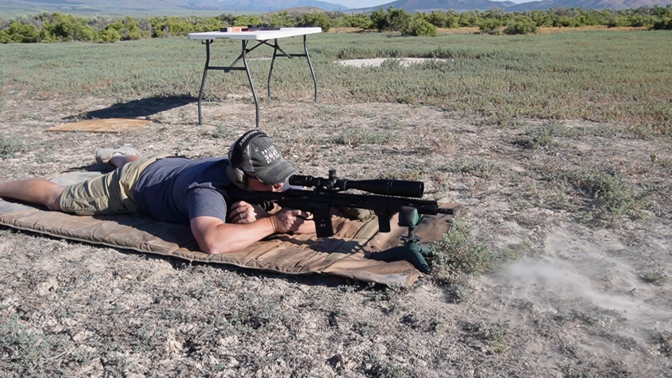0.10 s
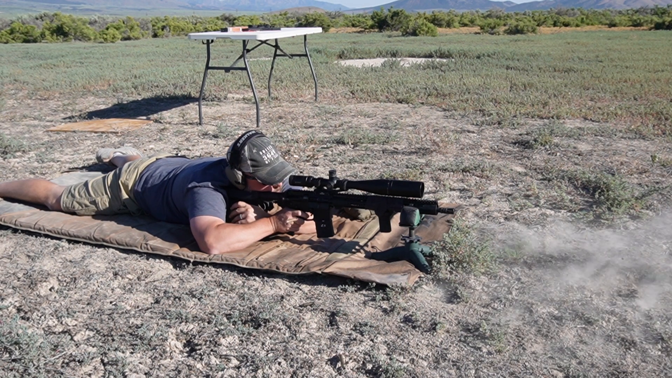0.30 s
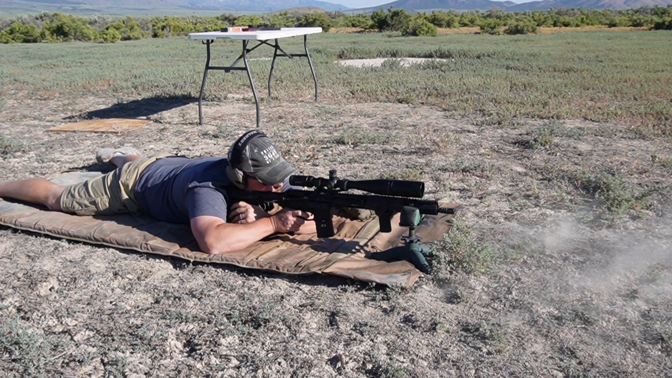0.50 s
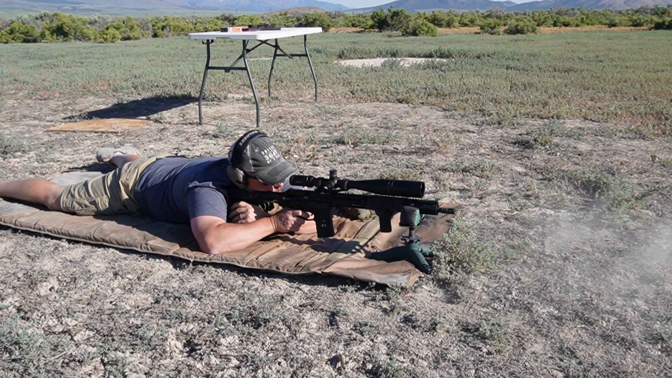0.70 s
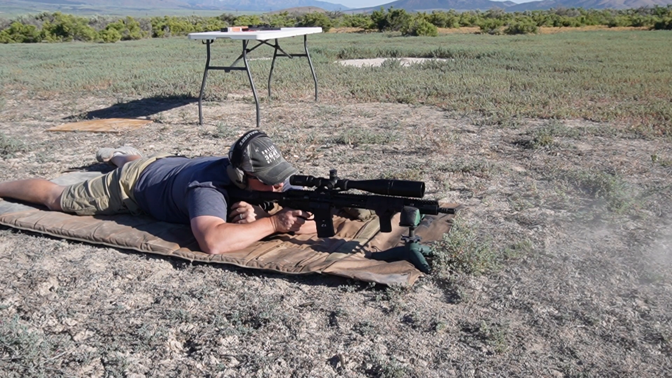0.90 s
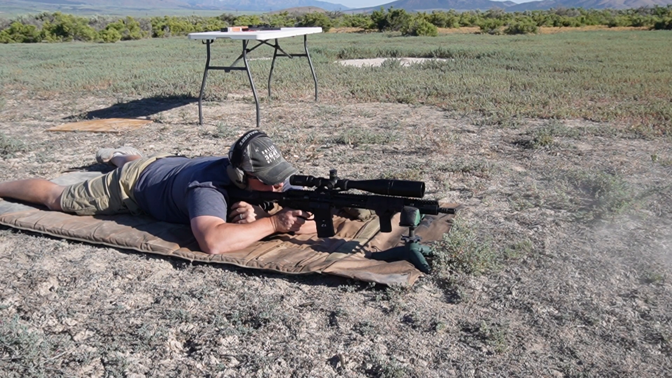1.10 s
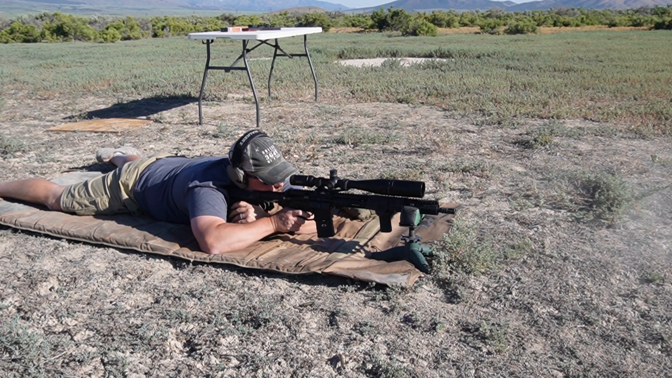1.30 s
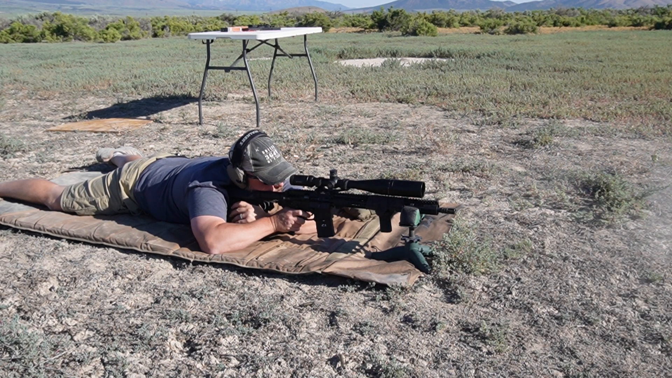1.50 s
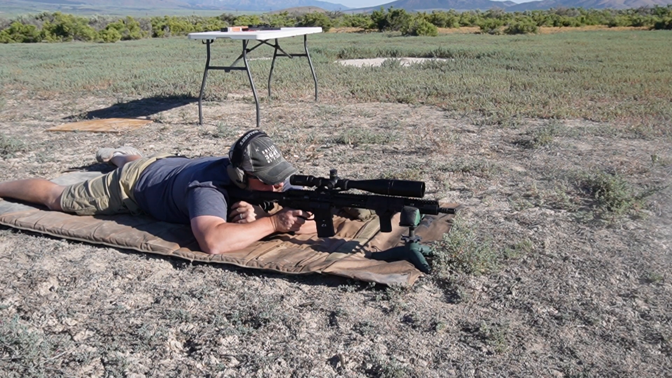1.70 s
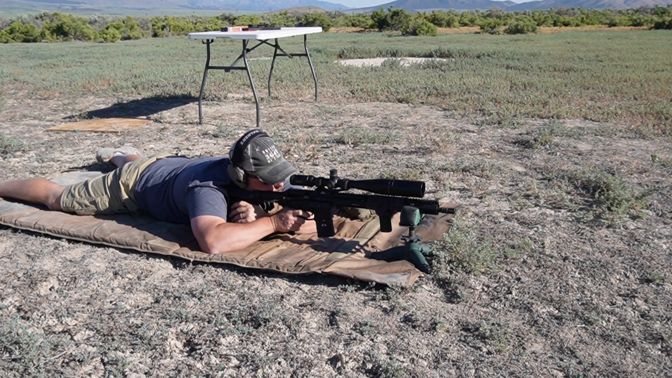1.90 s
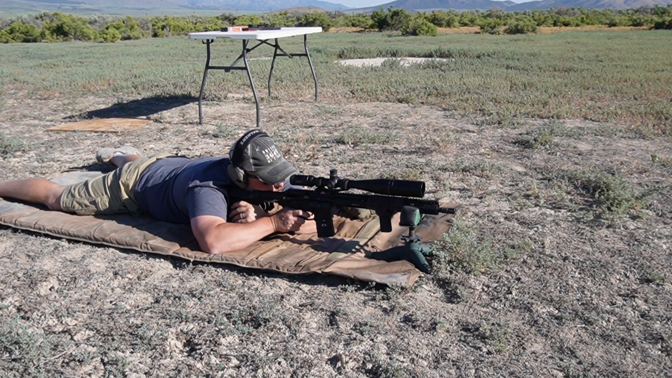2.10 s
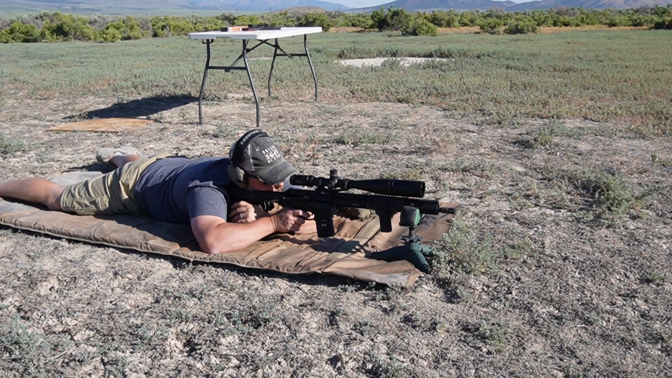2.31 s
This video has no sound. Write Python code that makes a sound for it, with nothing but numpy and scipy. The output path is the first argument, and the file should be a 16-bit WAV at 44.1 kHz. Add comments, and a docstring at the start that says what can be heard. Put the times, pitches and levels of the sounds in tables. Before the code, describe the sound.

One rifle shot at an open outdoor range. Faint air and a tiny tick, then at 0.2 s a sharp crack and clipped blast, with bolt clatter, low metallic ring and a grainy hissing rush until about 0.5 s. A spent case clinks at 0.6 s and bounces softly near 0.8. At 1.0 s a loud dry smack returns from downrange. Dull echoes fade over faint drone and whine.

```python
"""Rifle shot on an open range

One shot on dirt: a short crack leads the muzzle blast, which overloads the microphone.
The action cycles and rings while the blast scatters back from the ground as grainy, coloured noise.
The spent case lands and bounces on pulsing modes, and a sharp smack comes back from downrange.
A faint echo rolls in from the hills as dull noise, over still air, a far drone and a thin whine."""
import sys
import numpy as np
from scipy import signal
from scipy.fft import rfft, irfft, next_fast_len
from scipy.io import wavfile
from scipy.ndimage import uniform_filter1d, map_coordinates

SR = 44100
rng = np.random.default_rng(int(sys.argv[2]) if len(sys.argv) > 2 else 0)


def generate_wav(signal):
    """Clip the signal to [-1, 1] and save it as 16-bit WAV at the path in sys.argv[1]."""
    frames = np.transpose(np.atleast_2d(signal))
    scaled = np.clip(frames, -1, 1) * 32767
    pcm = np.round(scaled).astype(np.int16)
    wavfile.write(sys.argv[1], SR, pcm)


N = 110250

# Still air: f/Hz, level/dB
AIR_COLOUR = [(25, 14), (60, 11), (130, 0), (420, -1), (900, -11), (2500, -15), (7000, -17), (15500, -17.5)]
AIR_DB = -57.3
# Faint far drone: t/s, pitch f/Hz, fundamental rms level/dB, octave rms level/dB
DRONE = [(0, 179, -62, -65), (1.1, 181, -65, -74), (1.75, 182, -62, -72), (2, 184.5, -58.5, -62),
         (2.5, 185.5, -63.5, -71)]
DRONE_WAVER_DB = 1.5
# Thin whine: overtone spacing, rms level of its lowest tone, loss from each overtone to the next
WHINE_HZ, WHINE_DB, WHINE_LOSS_DB = 250, -77, .9

# Small ticks of trigger and grit: t/s, level/dB, t60/s, centre f/Hz
TICKS = [(.163, -47.5, .04, 1700), (.5972, -52, .03, 7000), (.747, -52, .04, 6000),
         (1.1679, -47, .016, 4700), (1.452, -60, .06, 3500)]

# Parts of the report: start t/s, level/dB, attack/s, hold/s, t60/s
CRACK = (.2124, -10, .0005, .0009, .013)
BLAST = (.2174, -3, .0002, .005, .018)
BOOM = (.221, -15.5, .003, .046, .016)
SWING = (.2183, -6.5, .001, .006, .08)
# The blast's pressure swing falls by the drop towards its low pitch; the fall is a time constant
SWING_LOW_HZ, SWING_DROP_HZ, SWING_FALL_S = 280, 2700, .0062
SWING_ROUGH_RAD = .9
# Separate thumps within the boom: t/s, level/dB
THUMPS = [(.2423, -16), (.2662, -11)]
THUMP_T60_S = .008
# Colours of the report: f/Hz, level/dB
CRACK_COLOUR = [(350, 1), (1300, -3), (3400, 0), (7700, -5), (15000, -20)]
BLAST_COLOUR = [(400, -1), (1850, 2), (2800, -6), (4500, -5), (5900, 2), (7000, -6), (9500, -7),
                (15000, -18)]
BOOM_COLOUR = [(70, -37), (170, -9), (260, -14), (340, 1), (650, 0), (780, -12), (1650, -6), (2400, -22)]

# Blast scattered by stones and scrub: t/s, treble level/dB, bass level/dB
SCATTER = [(.226, -24, -30), (.27, -20.5, -25), (.3, -18.5, -23), (.335, -12, -26), (.38, -18.5, -32),
           (.445, -25.5, -37), (.48, -35, -43), (.52, -58, -50)]
# Colours of the scattered treble and bass: f/Hz, level/dB
SCATTER_TREBLE_COLOUR = [(800, -14), (1400, -8), (1800, -1), (2300, -11), (2900, -12), (3700, -2),
                         (4600, -1), (5200, -11), (5900, -8), (6800, 3), (7400, 1), (7900, -8), (8900, -8),
                         (9700, -14), (10500, -5), (11400, -15.5), (15000, -22)]
SCATTER_BASS_COLOUR = [(60, -33), (160, -7), (250, -9), (340, -1), (440, 0), (600, -6), (800, -11),
                       (2500, -22)]
# Graininess: depth, and random knots a second (the swing's roughness shares this rate)
GRAIN_DB, GRAIN_RATE = 2.8, 600
# Metallic ring within the rush: f/Hz
ZING_HZ = [4605, 6710, 6810, 6892, 7224, 7364, 7436]
ZING_DB = -15
# The latest reflections lose their top between these moments: t/s
DULL_S = (.41, .49)
DULL_HZ = 5500

# Blows of the cycling action: t/s, level/dB
ACTION_BLOWS = [(.2415, -23), (.2635, -17), (.2742, -9), (.2775, -13), (.2875, -18)]
# Colour of the blows: f/Hz, level/dB
ACTION_COLOUR = [(600, -10), (1800, 0), (4200, 1), (11000, -7), (15000, -17)]
ACTION_T60_S = .025
# Low ring of the action: f/Hz, level/dB relative to SPRING_DB, t60/s
SPRING_MODES = [(340, -2, .5), (431, 0, .55), (475, -1, .45), (587, -7, .45), (642, -1, .3), (722, -16, 1),
                (1880, -16, .6)]
SPRING_DB = -22

# Hiss returned by the scrub: start t/s, level/dB, attack/s, hold/s, t60/s
HISS = (.44, -58, .03, .22, 1.2)
# Roll from distant slopes: t/s, level/dB
ECHO = [(.45, -50), (.75, -53), (.9, -58), (1.2, -62), (1.38, -56), (1.62, -57), (2, -66), (2.5, -75)]
# Colours of hiss and roll: f/Hz, level/dB
HISS_COLOUR = [(700, -6), (1900, 0), (2600, -4), (4900, 1), (7000, -8), (12000, -21)]
ECHO_COLOUR = [(130, -16), (260, 0), (450, -1), (800, -11), (1250, -21), (1800, -18), (2800, -26),
               (8000, -38)]

# Case on the ground: t/s, click level/dB, lower mode level/dB, upper mode level/dB, spin/(turns/s)
CASE_HITS = [(.6157, -35, -35.5, -38, 24), (.7903, -49, -50, -51, 7), (.8067, -47, -43, -60, 0)]
# Ringing modes of the case: f/Hz, t60/s, swells per turn
CASE_MODES = [(10965, .25, 2.1), (13010, .45, 1)]
# Colour of the case's clicks: f/Hz, level/dB
CASE_COLOUR = [(850, 5), (1250, -8), (1600, 7), (2300, -10), (3300, 3), (4600, -13), (6000, 0), (8500, -12),
               (12000, -5), (15500, -18)]
CASE_T60_S = .014

# Smack from downrange, its close reflections and its tail: start t/s, level/dB, attack/s, hold/s, t60/s
SMACK = (1.0044, -9.5, .0003, .0015, .014)
SMACK_SPRAY = (1.006, -33, .001, .002, .075)
SMACK_TAIL = (1.008, -52, .003, .01, .42)
# Colours of smack and tail: f/Hz, level/dB
SMACK_COLOUR = [(220, -18), (390, -2), (460, -10), (570, -2), (830, 1), (950, -11), (1300, 3), (1800, -2),
                (2400, -8), (2950, 1), (3500, -6), (10600, -14), (15000, -28)]
TAIL_COLOUR = [(300, -3), (800, 0), (1200, -8), (1900, -5), (2500, -14), (9000, -24)]
# Ring of the smack: f/Hz, level/dB relative to SMACK_RING_DB, t60/s
SMACK_MODES = [(657, -6, .077), (865, -1, .034), (1852, 2, .04), (3623, -21, .075), (4425, -8, .019),
               (5260, -26, .08), (515, -29, .6), (835, -29, .6), (1900, -29, .25)]
SMACK_RING_DB, SMACK_ROUGH_RAD = -19, .5

# Microphone: overload ceiling (full scale is 1), sharpness of its knee, and the band it passes
CLIP_TOP, CLIP_KNEE = .78, 5
LOW_CUT_HZ, TOP_HZ = 130, 15800


def amp(db):
    """Decibels to gain."""
    return 10 ** (np.asarray(db) / 20)


def unit(x):
    """Scale to rms 1."""
    return x / np.sqrt(np.mean(x ** 2) + 1e-20)


def clock():
    """Seconds at each sample."""
    return np.arange(N) / SR


def level(s, db):
    """Gain along a curve of dB against seconds, silent before it and fading out fast after it."""
    fade_db = 500 * np.maximum(clock() - s[-1], 0)
    return (clock() > s[0]) * amp(np.interp(clock(), s, db) - fade_db)


def envelope(start, db, attack, hold, t60):
    """Rise, hold, then an exponential release that drops 60 dB in t60 seconds."""
    t = clock() - start
    release = np.maximum(t - attack - hold, 0)
    return np.clip(t / attack, 0, 1) * amp(db - 60 * release / t60)


def wobble(rate):
    """A smooth random curve, rate knots a second."""
    return map_coordinates(rng.standard_normal(N // 8), [clock() * rate], mode="wrap")


def filtered(x, response):
    """Shape the spectrum of x by a gain that depends on frequency."""
    m = next_fast_len(N + 8192)
    return irfft(rfft(x, m) * response(np.fft.rfftfreq(m, 1 / SR)), m)[:N]


def noise(colour):
    """Noise of rms 1 with an (Hz, dB) colour, falling away beyond its ends."""
    f, db = np.transpose(colour)

    def response(hz):
        low_skirt = 1 + (f[0] / 2 / (hz + 1)) ** 4
        high_skirt = 1 + (hz / 2 / f[-1]) ** 4
        body = amp(np.interp(np.log(hz + 1), np.log(f + 1), db))
        return body / np.sqrt(low_skirt * high_skirt)

    return unit(filtered(rng.standard_normal(N), response))


def burst(colour, *shape):
    """A puff of coloured noise."""
    return noise(colour) * envelope(*shape)


def snap(colour, *shape):
    """A hard contact: a brief push, about equally strong at all frequencies, through the struck body's colour."""
    size = 8192
    gain = envelope(*shape)
    first = np.argmax(gain > 0)
    gain = gain[first:][:size]
    push = gain * rng.standard_normal(size)
    # Alternately flatten the spectrum and restore the envelope
    for _ in range(2):
        even = irfft(np.exp(1j * np.angle(rfft(push))))
        local_rms = np.sqrt(np.abs(uniform_filter1d(even ** 2, size=48)) + 1e-12)
        push = gain * even / local_rms
    f, db = np.transpose(colour)
    hz = np.fft.rfftfreq(size, 1 / SR) + 1
    body = amp(np.interp(np.log(hz), np.log(f), db)) / np.hypot(1, (f[0] / 2 / hz) ** 2)
    # Folding the cepstrum gives minimum phase, so the body answers at once without pre-ring
    cepstrum = irfft(np.log(body))
    minimum_phase = np.exp(rfft(2 * cepstrum[:size // 2], size))
    hit = irfft(rfft(push) * minimum_phase)
    hit = unit(hit) * np.sqrt(np.mean(gain ** 2))
    return np.pad(hit, (first, N))[:N]


def ring(modes, start, db, rough=0):
    """Damped modes struck at one moment; roughness blurs their phase."""
    t = np.maximum(clock() - start, 0)
    out = np.zeros(N)
    for hz, mode_db, t60 in modes:
        phase = 2 * np.pi * (hz * t + rng.random()) + rough * wobble(hz / 10)
        out += amp(db + mode_db - 60 * t / t60) * np.sin(phase)
    return (t > 0) * out


def background():
    """Still air as soft noise, a wavering drone of two harmonics and a thin whine of evenly spaced tones."""
    s, *columns = np.transpose(DRONE)
    hz, *levels_db = [np.interp(clock(), s, column) for column in columns]
    phase = 2 * np.pi * np.cumsum(hz) / SR
    tones = np.zeros(N)
    for k, db in enumerate(levels_db, 1):
        tones += amp(db + DRONE_WAVER_DB * wobble(8)) * np.sin(k * phase)
    for i, k in enumerate(range(3, 11)):
        whine = np.sin(2 * np.pi * (k * WHINE_HZ * clock() + rng.random()))
        tones += amp(WHINE_DB - WHINE_LOSS_DB * i) * whine
    return amp(AIR_DB) * noise(AIR_COLOUR) + np.sqrt(2) * tones  # root 2 takes sines from rms to peak


def ticks():
    """The trigger breaks and bits of grit fall, each a short puff of noise around its own centre."""
    out = np.zeros(N)
    for s, db, t60, hz in TICKS:
        colour = [(hz / 4, -10), (hz, 0), (hz * 2, -17)]
        out += burst(colour, s, db, .001, .001, t60)
    return out


def report():
    """The leading crack, then a blast whose pressure swings slow down from a bark to a boom."""
    crack = snap(CRACK_COLOUR, *CRACK)
    blast = snap(BLAST_COLOUR, *BLAST)
    since = np.maximum(clock() - SWING[0], 0)
    hz = SWING_LOW_HZ + SWING_DROP_HZ * np.exp(-since / SWING_FALL_S)
    phase = 2 * np.pi * np.cumsum(hz) / SR + SWING_ROUGH_RAD * wobble(GRAIN_RATE)
    swing = envelope(*SWING) * (np.sin(phase) + np.sin(2 * phase) / 4)
    thumps = sum(snap(BOOM_COLOUR, s, db, .001, .001, THUMP_T60_S) for s, db in THUMPS)
    return crack + blast + swing + thumps + burst(BOOM_COLOUR, *BOOM)


def scatter():
    """A grainy, ringing rush of small reflections from the nearby ground that dulls as it ends."""
    s, treble_db, bass_db = np.transpose(SCATTER)
    zing = sum(wobble(30) * np.sin(2 * np.pi * hz * clock()) for hz in ZING_HZ)
    grain = amp(GRAIN_DB * wobble(GRAIN_RATE))
    treble = unit((noise(SCATTER_TREBLE_COLOUR) + amp(ZING_DB) * zing) * grain)
    dull = unit(filtered(treble, lambda hz: 1 / (1 + (hz / DULL_HZ) ** 4)))
    lateness = np.interp(clock(), DULL_S, [0, 1])
    rush = treble + lateness * (dull - treble)
    return level(s, treble_db) * rush + level(s, bass_db) * noise(SCATTER_BASS_COLOUR)


def action():
    """The bolt runs back, slams shut and rattles: noise blows over a low ring of damped modes."""
    blows = sum(burst(ACTION_COLOUR, s, db, .0004, .0006, ACTION_T60_S) for s, db in ACTION_BLOWS)
    return blows + ring(SPRING_MODES, .24, SPRING_DB)


def echoes():
    """Scrub returns a hiss, distant slopes a dull uneven roll."""
    unevenness = amp(.6 * wobble(25))
    roll = level(*np.transpose(ECHO)) * noise(ECHO_COLOUR) * unevenness
    return burst(HISS_COLOUR, *HISS) + roll


def case():
    """The brass case clicks on the ground; each mode pulses as its lobes turn past the microphone."""
    out = np.zeros(N)
    for s, click_db, *rings_db, spin in CASE_HITS:
        out += snap(CASE_COLOUR, s, click_db, .001, .001, CASE_T60_S)
        for (hz, t60, lobes), db in zip(CASE_MODES, rings_db):
            tumble = np.cos(np.pi * lobes * spin * (clock() - s))
            out += tumble * ring([(hz, 0, t60)], s, db)
    return out


def smack():
    """A dry crack from downrange, most likely the bullet striking, with a rough ring and a faint tail."""
    clack = snap(SMACK_COLOUR, *SMACK)
    spray = burst(SMACK_COLOUR, *SMACK_SPRAY)
    rough_ring = ring(SMACK_MODES, SMACK[0], SMACK_RING_DB, SMACK_ROUGH_RAD)
    return clack + spray + rough_ring + burst(TAIL_COLOUR, *SMACK_TAIL)


def scene():
    """Everything at the microphone."""
    mix = background() + ticks() + report() + scatter() + action() + echoes() + case() + smack()
    return mix[None]


def record(dry):
    """The microphone clips on the blast; then the bass is thinned and the top ends at a steep band limit."""
    overload = np.abs(dry[0] / CLIP_TOP) ** CLIP_KNEE
    clipped = dry[0] / (1 + overload) ** (1 / CLIP_KNEE)
    low_cut = signal.butter(1, LOW_CUT_HZ, "highpass", fs=SR, output="sos")
    thinned = signal.sosfilt(low_cut, clipped)
    return filtered(thinned, lambda hz: 1 / np.sqrt(1 + (hz / TOP_HZ) ** 300))[None]


dry = scene()
out = record(dry)
generate_wav(out)
```